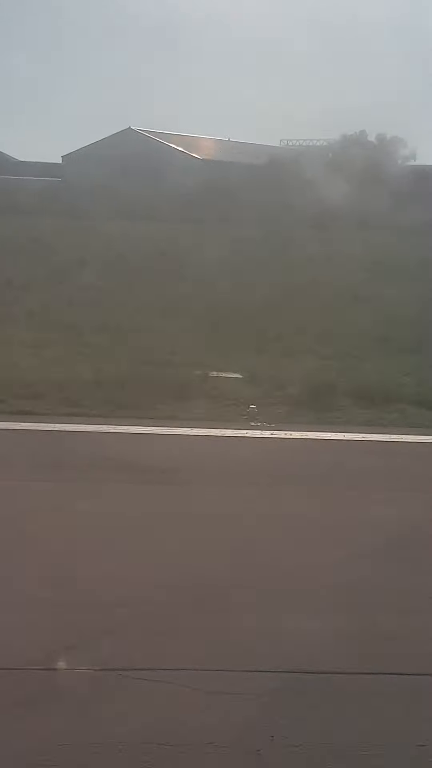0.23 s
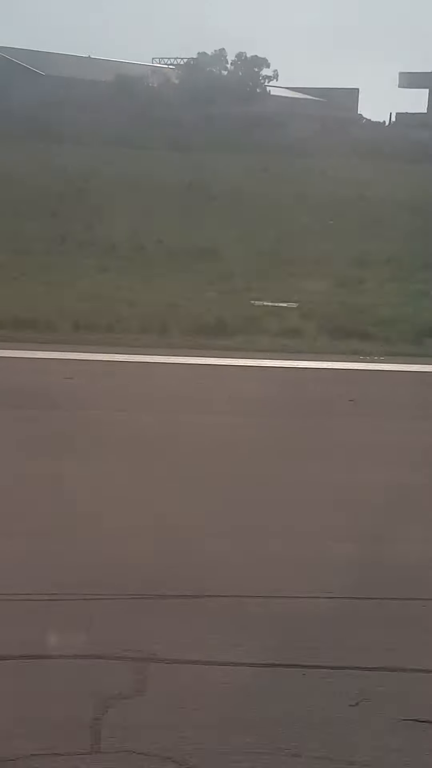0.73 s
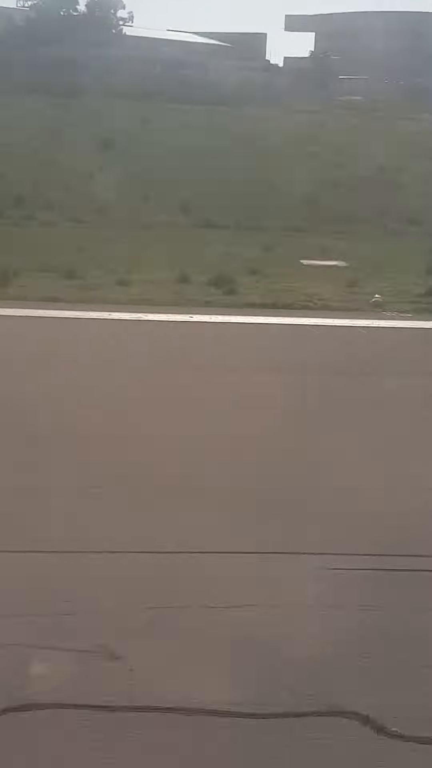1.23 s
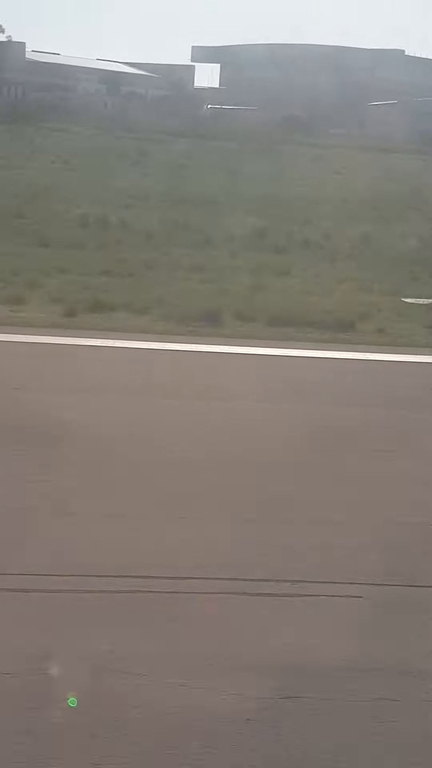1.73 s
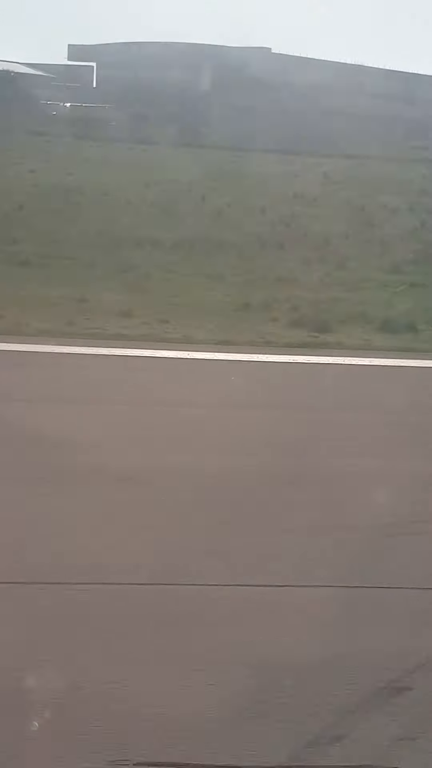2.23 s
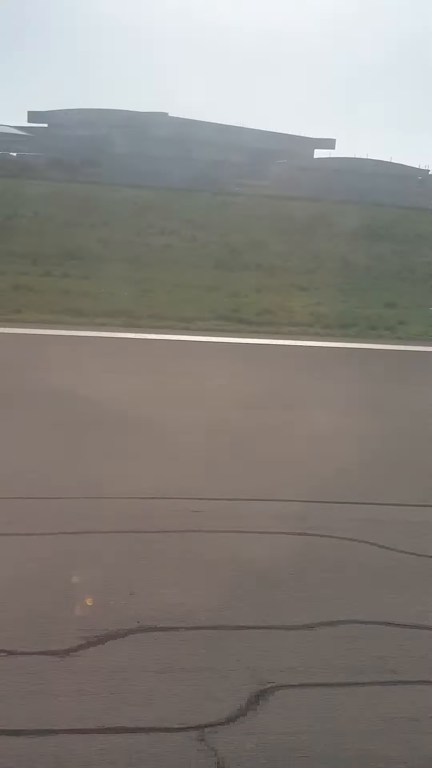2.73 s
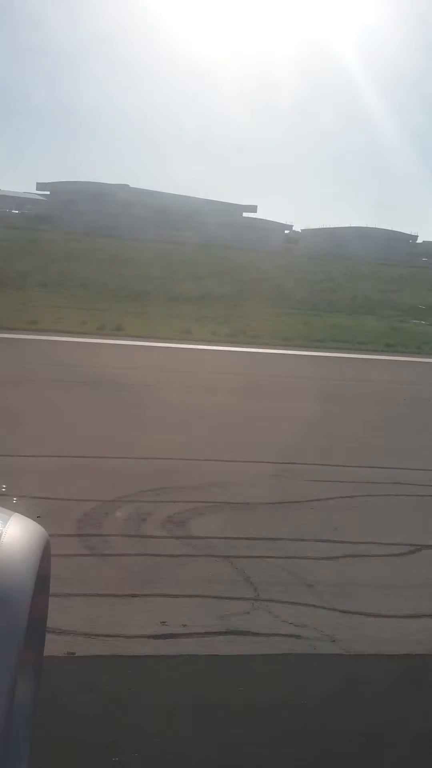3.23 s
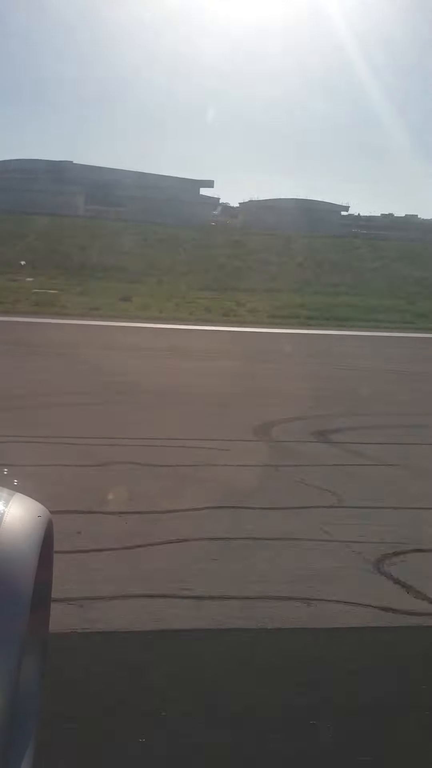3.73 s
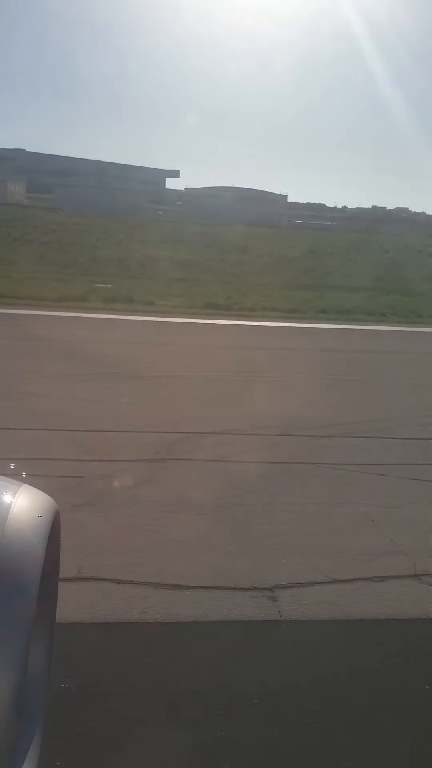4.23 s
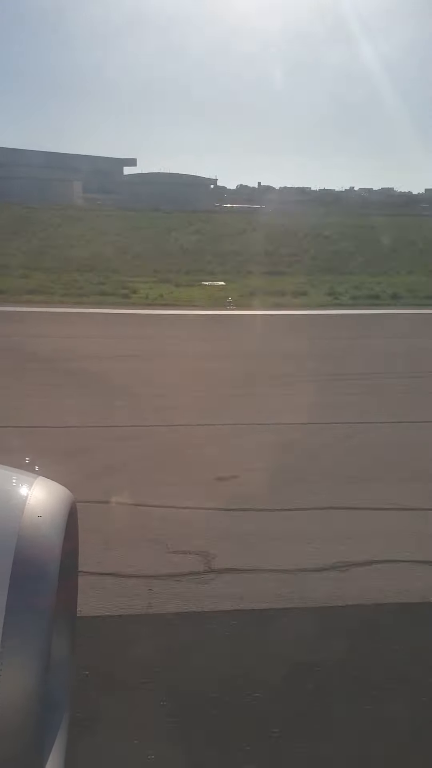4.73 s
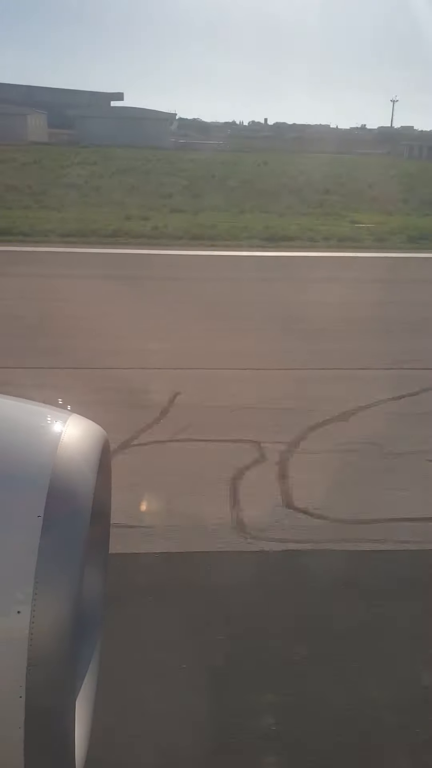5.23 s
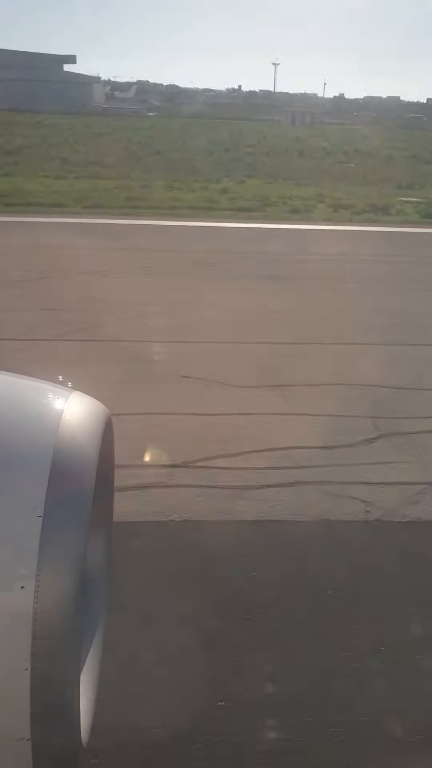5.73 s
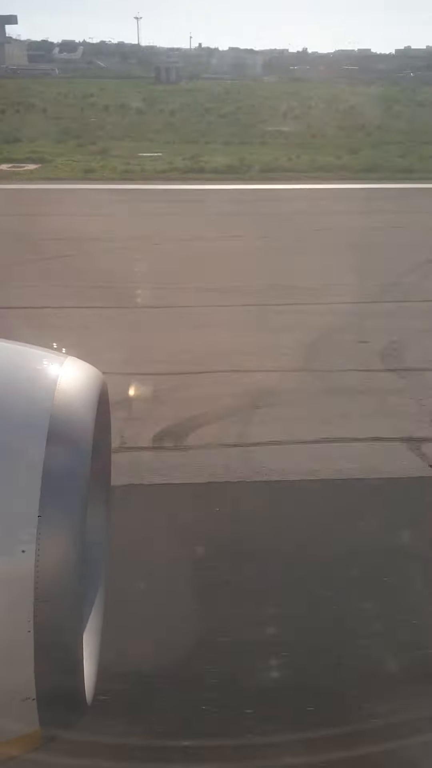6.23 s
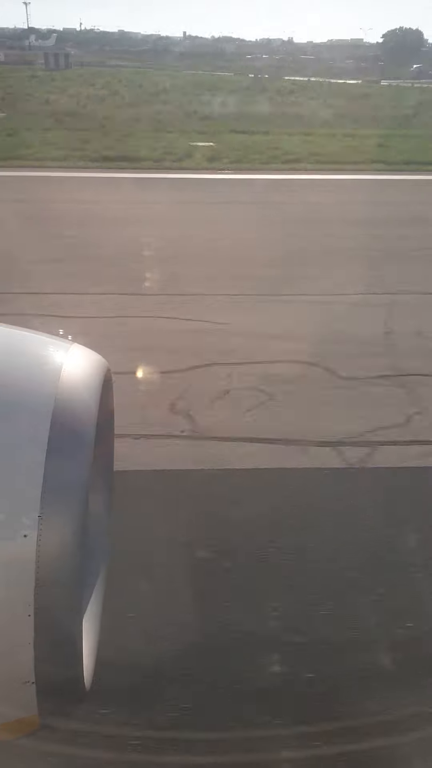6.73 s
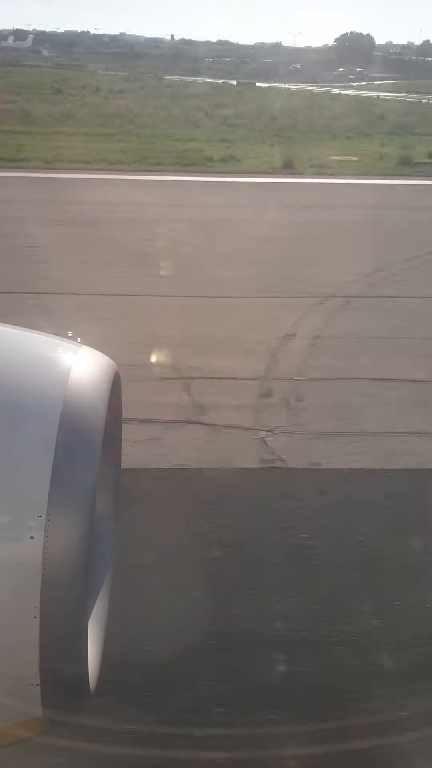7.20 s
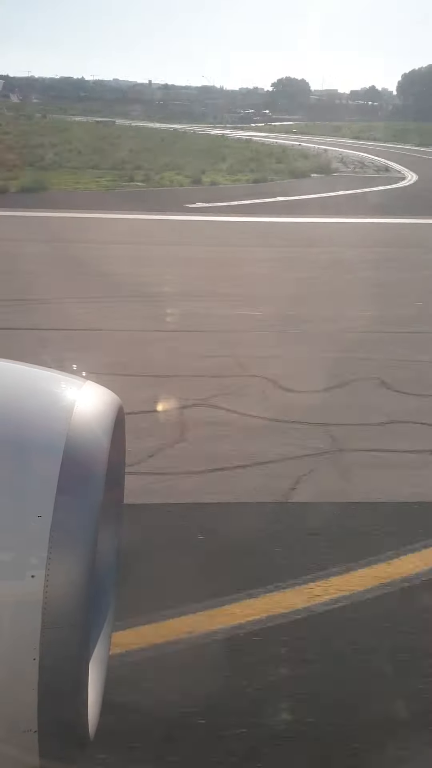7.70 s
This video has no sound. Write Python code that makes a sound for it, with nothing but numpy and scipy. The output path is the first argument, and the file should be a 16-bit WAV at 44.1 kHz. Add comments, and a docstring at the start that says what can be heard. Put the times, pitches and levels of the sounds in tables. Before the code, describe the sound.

A phone held in the cabin of a landing aircraft picks up a continuous, bass-heavy fuselage rumble, dull engine roar and softer airy hiss. Wheel blows swell as short deep thuds, hardest just before three seconds, shaking bins and panels. A low drone comes forward near four seconds. Later another thump, low shudders, rougher tyre noise and hard plastic snapping crowd the last stretch, without stopping.

```python
"""Window seat beside the engine of an airliner landing, heard by a phone's two microphone ports for eight seconds.
From the start the fuselage booms as filtered noise over engine, tyre and air noise, and a low sine drones.
The plastic trim rustles, rattles and squeaks, mostly on the right: noise bursts, decaying rings and gliding tones.
Near 2.5 s come the hardest thumps, swelling sines, and more air hiss; by 3.5 s the weight is on the wheels.
The drone is strongest near 4 s; coarse asphalt, low shudders and hard rattles fill the last two and a half seconds."""
import sys
import numpy as np
from scipy import signal
from scipy.fft import rfft, irfft
from scipy.io import wavfile
from scipy.ndimage import uniform_filter1d

SR = 44100
rng = np.random.default_rng(int(sys.argv[2]) if len(sys.argv) > 2 else 0)


def digitize_waveform(pressure):
    """Quantize a signal to 16-bit integers and store it at the path in sys.argv[1].

    Rows of a 2-D input are taken as channels; values are limited to [-1, 1].
    """
    field = np.atleast_2d(pressure).T
    bounded = np.clip(field, -1, 1)
    quanta = np.round(bounded * 32767).astype(np.int16)
    wavfile.write(sys.argv[1], SR, quanta)


N = 351036
TIME = np.arange(N) / SR  # s
FREQ = np.maximum(np.arange(N // 2 + 1) * SR / N, 1)  # Hz

# how hard the runway shakes the hull: start_s, boom level_db
RUNWAY_SHAKE = [(0, -18.5), (.6, -19), (1.05, -15.5), (1.8, -18.5), (2.2, -14.5), (2.43, -17), (2.9, -17.5),
                (3.6, -20), (4.2, -18.5), (5.38, -19.5), (5.52, -17), (6.05, -15.5), (6.5, -20.5),
                (6.7, -15.5), (6.92, -23.5), (7.15, -17), (7.55, -19.5), (7.95, -16)]
# strength of the engine's roar: start_s, level_db
ENGINE_LEVEL = [(0, -28.5), (.7, -30), (1.5, -28.5), (2.6, -29.5), (3.7, -31.5), (5.6, -29), (6.3, -30.5),
                (7.3, -29.5), (7.95, -31)]
# low boom of the hull: frequency_hz, density_db (per Hz, relative)
BOOM_SPECTRUM = [(15, -45), (24, -32), (32, -23), (43, -5.5), (51, 0.5), (63, -1.5), (78, -5.5), (95, -13),
                 (125, -29.5)]
# rumble of the cabin air: frequency_hz, density_db (per Hz, relative)
RUMBLE_SPECTRUM = [(60, -18.5), (88, -1), (104, 0), (128, -3.5), (153, -3), (180, -6.5), (230, -30.5)]
RUMBLE_OVER_ROAR_DB = 6.5


def fuselage(throb_db=1.5, throb_rate=9):
    """The runway shakes the hull into a throbbing boom; the cabin air rumbles with the engine."""
    (boom_db,), (engine_db,) = curves(RUNWAY_SHAKE), curves(ENGINE_LEVEL)
    boom = steady(diffuse(BOOM_SPECTRUM), span_s=.15)
    boom = boom * undb(boom_db + throb_db * walk(throb_rate))
    rumble = steady(diffuse(RUMBLE_SPECTRUM), span_s=0.14)
    return boom + rumble * undb(engine_db + RUMBLE_OVER_ROAR_DB)


# blows through the landing gear: start_s, peak level_db
GEAR_BLOWS = [(.03, -8), (2.245, -4), (2.523, -2), (4.908, -8), (5.465, -12), (6.639, -5)]
THUMP_HZ = 59.6


def gear(swell_s=0.034):
    """Each blow on the wheels swells through the struts into a few cycles of the hull."""
    out = np.zeros(N)
    for start_s, level_db in GEAR_BLOWS:
        t = np.maximum(TIME - start_s, 0)
        envelope = (t / swell_s * np.exp(1 - t / swell_s)) ** 6  # one at swell_s
        out += undb(level_db) * envelope * np.sin(2 * np.pi * THUMP_HZ * t)
    return out


# shudders of the hull: middle_s, length_s, mean pitch_hz, peak level_db
HULL_SHUDDERS = [(5.601, 0.34, 54, -15), (5.968, 0.29, 52.5, -11.5), (7.162, 0.39, 60, -16)]


def shudders(waver=0.018):
    """Over uneven stretches the hull shudders at one low pitch, which wavers slightly."""
    stretch = np.cumsum(1 + waver * walk(15)) / SR
    out = np.zeros(N)
    for middle_s, length_s, pitch_hz, level_db in HULL_SHUDDERS:
        out += undb(level_db) * swell(middle_s, length_s) * np.sin(2 * np.pi * pitch_hz * stretch)
    return out


# the low drone: start_s, mean pitch_hz, rms level_db
DRONE_PATH = [(0, 162, -36), (.95, 176, -41), (1.3, 177, -28), (1.55, 168, -32), (2.2, 160, -29.5),
              (2.42, 169, -34), (2.6, 169, -27), (3.6, 163, -23), (3.97, 161, -22.5), (4.35, 159, -30),
              (5.2, 159, -29), (5.6, 167.1, -27), (6.3, 161.7, -28), (6.55, 173.1, -29.5),
              (6.8, 172, -24.5), (7.16, 168.8, -31), (7.3, 167, -24), (7.95, 163, -25)]


def drone(waver_hz=1.304, flutter_db=1.35, firm_db=-25):
    """One unbroken low hum: firm in pitch while it is strong, wavering as it fades."""
    pitch_hz, level_db = curves(DRONE_PATH)
    # the waver is waver_hz at firm_db and widens as the level falls
    pitch = pitch_hz + waver_hz * undb(np.minimum(firm_db - level_db, 10)) * walk(22)
    gain = np.sqrt(2) * undb(level_db + flutter_db * walk(20))
    return gain * np.sin(2 * np.pi * np.cumsum(pitch) / SR)


# spectra of engine roar, tyres on asphalt and air along the skin: frequency_hz, density_db (per Hz, relative)
ROAR_SPECTRUM = [(140, -22), (190, -1.5), (218, 0), (258, -8), (305, -5.5), (355, -13), (380, -13.5),
                 (480, -20.5), (600, -29), (900, -52.5)]
TYRE_SPECTRUM = [(400, -18), (540, -4), (630, -1.5), (740, 0), (880, -1.5), (1000, -5), (1200, -19),
                 (1800, -41.5)]
AIR_SPECTRUM = [(700, -21.5), (1100, 0.5), (1450, 2), (1750, -0.5), (2100, 0), (2650, -3.5), (3100, -11),
                (5000, -17), (8000, -42)]
# tyre rush and air hiss at the usual shake (dB), and the dB they gain per dB of shake
USUAL_SHAKE_DB = -18
TYRE_DB, TYRE_SHARE, AIR_DB, AIR_SHARE = -52, 0.32, -54.0, 0.15
# the tyres scrub as they spin up: middle, length, rise of the hiss
SCRUB_S, SCRUB_LENGTH_S, SCRUB_DB = 2.55, 0.65, 1
# the tyres rush louder over coarse asphalt: middle, length, rise
COARSE_S, COARSE_LENGTH_S, COARSE_DB = 5.75, 1.1, 2.5
SETTLED_AIR_DB = -0.64  # the air hisses less with the weight on the wheels


def rush():
    """Engine roar, tyres on asphalt and air along the skin, each with its own turbulence."""
    (boom_db,), (engine_db,) = curves(RUNWAY_SHAKE), curves(ENGINE_LEVEL)
    shake_db = boom_db - USUAL_SHAKE_DB
    landing_db = SCRUB_DB * swell(SCRUB_S, SCRUB_LENGTH_S) + SETTLED_AIR_DB * settled()
    coarse_db = COARSE_DB * swell(COARSE_S, COARSE_LENGTH_S)
    roar = steady(diffuse(ROAR_SPECTRUM), span_s=0.39) * undb(engine_db + 0.88 * walk(25))
    tyre_db = TYRE_DB + TYRE_SHARE * shake_db + coarse_db + 0.4 * walk(30)
    tyres = diffuse(TYRE_SPECTRUM, echo_db=-29) * undb(tyre_db)
    air_db = AIR_DB + AIR_SHARE * shake_db + landing_db + .9 * walk(40)
    air = diffuse(AIR_SPECTRUM, echo_db=-24.5) * undb(air_db)
    return roar + eddies(tyres + air, depth_db=1.68)


# rattles of loose trim: start_s, level_db (reference for clack, snap and panel rings),
# snap brightness_db (relative to level_db), main ring pitch_hz, main ring level_db
TRIM_RATTLES = [(.208, -54, -20, 3300, -59), (.298, -57, -25, 3300, -56), (.438, -65, -8, 3500, -59),
                (.544, -59, -26, 5200, -58), (0.7157, -50.5, -24, 3900, -58),
                (0.8051, -52.5, -23, 5200, -58), (.885, -60, -28.5, 4050, -52.5),
                (1.306, -52.5, -20, 5200, -62.5), (1.4715, -53.5, -28, 4700, -59),
                (1.644, -61, -25.5, 4330, -60), (2.325, -56, -21, 3900, -57), (2.38, -57, -22, 4100, -59),
                (2.5685, -50.5, -26, 4600, -53.5), (2.6075, -53, -24, 3700, -56),
                (2.632, -53, -20, 4550, -54), (2.772, -59, -22.5, 3900, -54),
                (2.798, -57.5, -21.5, 4000, -53.5), (2.826, -55.5, -16, 4450, -54),
                (2.975, -56, -21, 6650, -61.5), (3.005, -54.5, -23, 4200, -54),
                (4.0382, -52, -16, 3700, -59), (4.0614, -53, -13, 3700, -57), (4.188, -56, -19, 5200, -65),
                (4.403, -59, -20, 5600, -59), (4.555, -53.5, -18, 3300, -56),
                (4.703, -56.5, -17, 5140, -57), (4.7685, -56, -12, 4600, -59),
                (4.7845, -52.5, -11, 5200, -58), (4.8144, -58, -15.5, 5600, -61),
                (4.908, -56.5, -17, 3750, -53.5), (4.945, -55.5, -17.5, 5660, -56),
                (4.993, -49, -15, 6400, -54), (5.0269, -55.5, -14, 6900, -63), (5.441, -51, -14, 4500, -58),
                (5.5188, -55.5, -5, 5300, -60), (6.442, -54, -15, 4300, -61), (6.6744, -51, -20, 5100, -59),
                (6.7315, -52, -18, 4300, -51.5), (6.783, -46, -12, 4700, -51),
                (6.864, -51.5, -21, 3700, -55), (6.953, -52.5, -13, 6400, -58),
                (7.0907, -50, -17, 5050, -49), (7.1054, -54, -7, 6100, -51), (7.207, -53.5, -25, 4900, -51),
                (7.2366, -49.5, -21, 4400, -52), (7.502, -55, -11, 4050, -53),
                (7.5377, -55, -18, 3830, -50), (7.616, -51.5, -14.5, 4700, -54)]
# clack of the trim: frequency_hz, density_db (per Hz, relative)
CLACK_SPECTRUM = [(1000, -15), (2400, 3.5), (4200, -1), (5800, -1.5), (7000, -6), (8800, -21.5),
                  (14000, -33)]
# fine crackle of plastic: frequency_hz, density_db (per Hz, relative)
CRACKLE_SPECTRUM = [(5000, -19.5), (8500, -8), (11000, -1), (12700, 0.5), (15500, -4), (18000, -15)]


def rattles(chatter_db=3, bounce_s=0.0099, bounce_db=-3):
    """Loose trim clacks and snaps as it chatters, rings at its own pitch and bounces once."""
    start_s, level_db, bright_db, ring_hz, ring_db = np.transpose(TRIM_RATTLES)
    clack = diffuse(CLACK_SPECTRUM, echo_db=-19.5) * bursts(
        start_s, level_db - 6.0, rise_s=0.00089, t60_s=0.12, tail_db=-15.0, tail_t60_s=0.4)
    snap = diffuse(CRACKLE_SPECTRUM) * bursts(
        start_s, level_db + bright_db + 0.5, rise_s=.0008, t60_s=0.076, tail_db=-17.5, tail_t60_s=.2)
    rings = panels(start_s, level_db + 0.5, t60_s=.08)
    rings = rings + main_rings(start_s, ring_db, ring_hz, t60_s=0.16, chatter_rate=1500)
    # each bounce comes one to two bounce_s later
    bounce_start_s = start_s + bounce_s * (1 + rng.random(len(start_s)))
    bounces = panels(bounce_start_s, level_db + bounce_db, t60_s=.08)
    return (clack + snap) * undb(chatter_db * walk(700)) + rings + bounces


# duller knocks of the luggage bins: start_s, level_db (of the noise; rings are set from it), initial ring pitch_hz
BIN_KNOCKS = [(.235, -52.5, 1400), (.44, -53, 2560), (.592, -54.5, 2310), (2.028, -55, 1790),
              (2.305, -49, 2130), (2.36, -52, 1690), (2.44, -51.5, 1450), (2.572, -47, 1660),
              (2.605, -47, 1544), (2.638, -50, 1390), (2.725, -53, 2420), (2.785, -52.5, 2480),
              (2.81, -52, 1620), (6.742, -48.5, 1405), (7.07, -53, 1383), (7.607, -49, 2450)]
# dull knock of a bin: frequency_hz, density_db (per Hz, relative)
BIN_SPECTRUM = [(300, -15), (900, 1), (1450, 4), (2400, -6), (3500, -13.5), (7000, -30)]


def bins(chatter_db=2.0):
    """The luggage bins knock and clatter dully and their hollow shells ring."""
    start_s, level_db, ring_hz = np.transpose(BIN_KNOCKS)
    knock = diffuse(BIN_SPECTRUM, echo_db=-14.5) * bursts(
        start_s, level_db, rise_s=0.002, t60_s=0.15, tail_db=-11.5, tail_t60_s=0.44)
    shells = main_rings(start_s, level_db + 4.5, ring_hz, t60_s=0.19, chatter_rate=200, sag_hz=2500)
    return knock * undb(chatter_db * walk(700)) + shells


# squeaks of rubbing plastic: start_s, level_db (reference for harmonics and scrape), initial slip rate pitch_hz
PLASTIC_SQUEAKS = [(.036, -50, 1450), (.238, -55, 1360), (.641, -56.5, 1380), (.978, -52, 1420),
                   (1.351, -50, 1427), (1.412, -58.5, 1383), (2.103, -44.5, 1432), (2.358, -51, 1430),
                   (2.416, -53, 1415), (2.447, -55, 1385), (2.564, -53, 1410), (2.606, -53, 1410),
                   (2.627, -51.5, 1415), (2.808, -54, 1432), (4.594, -52.5, 1402), (6.745, -57, 1388),
                   (7.049, -54, 1392), (7.069, -49, 1410)]


def squeaks(length_s=0.005, sag_hz=2000, rough=0.012, colour_db=1.5, harmonics_db=(-4.5, -9, -8.5, -1)):
    """Plastic sticks and slips, swelling for length_s as the pitch sags (Hz per s), each in its own colour."""
    out, t = np.zeros(N), TIME[:SR // 20]
    jitter = 1 + rough * walk(2200)
    envelope = (t / length_s * np.exp(1 - t / length_s)) ** 2
    draws = rng.standard_normal((len(PLASTIC_SQUEAKS), len(harmonics_db)))
    for (start_s, level_db, pitch_hz), draw in zip(PLASTIC_SQUEAKS, draws):
        start = int(start_s * SR)
        near = slice(start, start + len(t))
        phase = 2 * np.pi * np.cumsum((pitch_hz - sag_hz * t) * jitter[near]) / SR
        tone = np.zeros(len(t))
        for k, harmonic_db in enumerate(harmonics_db):
            tone += undb(harmonic_db + colour_db * draw[k]) * np.sin((k + 1) * phase)
        out[near] += undb(level_db) * envelope * tone
    return out * undb(2.0 * walk(500))


def scrapes(scrape_db=-7):
    """Every squeak drags a short dry scrape with it."""
    start_s, level_db, _ = np.transpose(PLASTIC_SQUEAKS)
    return diffuse(CLACK_SPECTRUM) * bursts(
        start_s, level_db + scrape_db, rise_s=.004, t60_s=0.098, tail_db=-18.5, tail_t60_s=.25)


# spells of rubbing between trim panels: middle_s, length_s, rustle level_db, fine crackle level_db
RUBBING_SPELLS = [(.27, 0.21, -69, -88), (0.99, 0.47, -63.5, -76.5), (2.353, 0.34, -64.5, -80.5),
                  (2.65, 0.3, -63.5, -76), (2.91, 0.21, -70.5, -74.5), (3.35, 0.72, -72, -80),
                  (4.14, 0.2, -70, -82), (4.82, 0.18, -72, -74.5), (5.249, 1, -66.5, -76.5),
                  (5.881, 0.53, -67, -78.5), (6.455, 0.41, -67.5, -75.5), (6.75, 0.35, -65, -72),
                  (7.1, 0.3, -66.5, -72), (7.68, 0.7, -67, -76)]
# rustle of the panels: frequency_hz, density_db (per Hz, relative)
RUSTLE_SPECTRUM = [(2000, -14), (3200, -2.5), (4000, -2), (5100, -2.5), (6300, -6), (7200, -11),
                   (8500, -25.5), (12000, -40.5)]
RUSTLE_DB, CRACKLE_DB = -70, -84.5  # between the spells, before the weight settles
SETTLED_RUB_DB = 1.5  # rise of this steady rubbing once the weight has settled


def chafing(grain_db=1.5, slip_db=1.57):
    """Panels rub in spells of tiny slips: a grainy rustle with a fine crackle on top."""
    load_db = SETTLED_RUB_DB * settled()
    rustle, crackle = undb(RUSTLE_DB + load_db), undb(CRACKLE_DB + load_db)
    for middle_s, length_s, rustle_db, crackle_db in RUBBING_SPELLS:
        spell = swell(middle_s, length_s)
        rustle = np.hypot(rustle, undb(rustle_db) * spell)
        crackle = np.hypot(crackle, undb(crackle_db) * spell)
    slips = undb(grain_db * walk(600) + slip_db * walk(70))
    rustling = rustle * diffuse(RUSTLE_SPECTRUM, echo_db=-29.5)
    crackling = crackle * diffuse(CRACKLE_SPECTRUM, echo_db=-28.5)
    return slips * (rustling + crackling)


# thin whistles and peeps, plus (rows at 6.755 s and 7.08 s) a stronger second harmonic for the squeaks there:
# middle_s, length_s, mean pitch_hz, level_db
THIN_WHISTLES = [(0.625, 0.058, 1640, -45.5), (0.985, 0.38, 4960, -62), (1.18, 0.3, 1270, -49),
                 (1.53, 0.066, 3420, -64), (1.897, 0.026, 1810, -46), (3.07, .08, 1560, -48.5),
                 (4.2, 0.4, 3680, -65), (5.462, 0.05, 1815, -47), (6.755, .03, 2750, -53),
                 (7.08, .035, 2740, -52.5), (7.7, 0.09, 1680, -49.5)]


def whistles(waver=.02, flutter_db=2.5, faint_db=-56, faint_s=0.034, low_hz=1150, high_hz=2200, count=55):
    """Thin airy tones swell and fade, unsteady in pitch and strength, among many short peeps."""
    out, stretch = np.zeros(N), np.cumsum(1 + waver * walk(900)) / SR
    peeps = []
    for when, pitch in rng.random((count, 2)):
        peeps.append((when * TIME[-1], faint_s, low_hz * (high_hz / low_hz) ** pitch, faint_db))
    for middle_s, length_s, pitch_hz, level_db in list(THIN_WHISTLES) + peeps:
        near = slice(max(int((middle_s - 2 * length_s) * SR), 0), int((middle_s + 2 * length_s) * SR))
        envelope = np.exp(-(2 * (TIME[near] - middle_s) / length_s) ** 2)
        out[near] += undb(level_db) * envelope * np.sin(2 * np.pi * pitch_hz * stretch[near])
    return out * undb(flutter_db * walk(90))


def small_ticks(count=90, mean_db=-55, spread_db=2):
    """Faint ticks of fittings all over the cabin, each a short ring of three modes."""
    draw = rng.random((count, 2))
    level_db = mean_db + spread_db * (2 * draw[:, 1] - 1)
    return panels(draw[:, 0] * TIME[-1], level_db, low_hz=1790, high_hz=6020, t60_s=0.073, count=3)


def panels(times, dbs, low_hz=2600, high_hz=6200, t60_s=0.088, count=6):
    """Every struck panel rings briefly with a few modes of its own."""
    out, t = np.zeros(N), TIME[:SR // 8]
    for start_s, level_db, draw in zip(times, dbs, rng.random((len(times), count))):
        mode_hz = low_hz + (high_hz - low_hz) * draw[:, None]
        modes = np.sin(2 * np.pi * mode_hz * t + 2 * np.pi * rng.random((count, 1)))
        ring = modes.mean(0) * np.exp(-np.log(1000) * t / t60_s)
        start = int(start_s * SR)
        out[start:start + len(t)] += undb(level_db) * ring[:N - start]
    return ports(out)


def main_rings(times, dbs, pitches, t60_s, chatter_rate, sag_hz=0):
    """A struck part's main resonance, broadened by chatter (contacts per s), sinking as it relaxes (Hz per s)."""
    out, t = np.zeros(N), TIME[:SR // 5]
    chatter = (walk(chatter_rate) + 1j * walk(chatter_rate)) / np.sqrt(2)
    for start_s, level_db, pitch_hz in zip(times, dbs, pitches):
        near = slice(int(start_s * SR), int(start_s * SR) + len(t))
        turn = 2j * np.pi * (pitch_hz - sag_hz * t / 2)
        ring = np.exp((turn - np.log(1000) / t60_s) * t)
        out[near] += undb(level_db) * np.real(chatter[near] * ring)
    return ports(out)


def bursts(times, dbs, rise_s, t60_s, tail_db, tail_t60_s):
    """Envelope of contacts: a quick rise, a short ring and a weak tail from the cabin."""
    t = TIME[:SR // 2]
    decay = 1000 ** (-t / t60_s) + undb(tail_db) * 1000 ** (-t / tail_t60_s)
    shape = (1 - np.exp(-t / rise_s)) * decay
    power = np.zeros(N)
    np.add.at(power, (np.asarray(times) * SR).astype(int), undb(dbs) ** 2)
    return np.sqrt(np.maximum(signal.fftconvolve(power, shape ** 2)[:N], 0))


def eddies(pair, depth_db, size=512, count=5):
    """Turbulence: every narrow band swells and sinks on its own over a few hundredths of a second."""
    bands = signal.stft(pair, nperseg=size)[2]
    chance = uniform_filter1d(rng.standard_normal(bands.shape[1:]), count, axis=1)
    chance = uniform_filter1d(chance, 2, axis=0)
    return signal.istft(bands * undb(depth_db * unit(chance)), nperseg=size)[1][:, :N]


# likeness of the sound at the two microphone ports: frequency_hz, squared coherence (clipped to 0..1)
PORT_LIKENESS = [(60, 1.1), (130, 0.85), (300, 0.95), (500, 0.8), (800, 0.3), (1200, 0.07), (15000, -0.13)]


def diffuse(spectrum, echo_db=-60):
    """Noise from all round the cabin: long waves reach both ports alike; nearby panels comb it with echoes."""
    mid, side = rfft(rng.standard_normal((2, N)))
    alike = np.sqrt(np.clip(over_freq(PORT_LIKENESS), 0, 1))
    mid, side = mid * np.sqrt(1 + alike), side * np.sqrt(1 - alike)
    walls = np.zeros(N)
    walls[0] = 1
    delays = rng.integers(SR // 300, SR // 50, size=12)  # 3 to 20 ms
    walls[delays] = undb(echo_db) * rng.choice([-1, 1], size=12)
    pair = irfft(np.array([mid + side, mid - side]) * rfft(walls), N)
    pair = colour(pair, spectrum)
    return ports(pair / np.sqrt(np.mean(pair.mean(0) ** 2)))


# tilt between the two microphone ports: frequency_hz, left minus right level_db
PORT_TILT = [(60, 0), (200, -2), (380, -3.5), (700, -2.5), (900, -1), (1290, -6), (2380, -13), (4400, -11),
             (8120, -19), (13000, -8)]
PORT_LAG_S = 0.00025


def ports(x):
    """Two ports of a phone: the left hears the cabin a little earlier, the right hears it brighter."""
    left = undb(over_freq(PORT_TILT))
    early_left = left * np.exp(2j * np.pi * FREQ * PORT_LAG_S)
    keep_power = np.sqrt(2 / (1 + left ** 2))
    response = np.array([early_left, np.ones(len(FREQ))]) * keep_power
    return irfft(rfft(x) * response, N)


def steady(pair, span_s):
    """Even out swells slower than span_s and keep the quick throb."""
    return pair / np.sqrt(uniform_filter1d(pair.mean(0) ** 2, int(span_s * SR)) + 1e-9)


def swell(middle_s, length_s):
    """A smooth rise and fall, one at its middle; length_s is its width at 1/e."""
    return np.exp(-(2 * (TIME - middle_s) / length_s) ** 2)


SETTLE_S, SETTLING_S = 3.1, .12  # when the weight settles, and its time constant


def settled():
    """Share of the weight on the wheels, from zero to one."""
    return .5 + .5 * np.tanh((TIME - SETTLE_S) / SETTLING_S)


def walk(rate):
    """Slow chance: random levels held 1 / rate s and slewed twice, spread one."""
    k = max(int(SR / rate), 1)
    held = np.repeat(rng.standard_normal(N // k + 1), k)
    return unit(uniform_filter1d(uniform_filter1d(held, k), k)[:N])


def colour(x, spectrum):
    """Filter by a spectrum that falls away steeply beyond its ends."""
    low_skirt = np.minimum(FREQ / spectrum[0][0], 1) ** 2
    high_skirt = np.minimum(spectrum[-1][0] / FREQ, 1) ** 2
    return irfft(rfft(x) * undb(over_freq(spectrum)) * low_skirt * high_skirt, N)


def over_freq(points):
    """Points joined on a log-frequency axis."""
    hz, value = np.transpose(points)
    return np.interp(np.log(FREQ), np.log(hz), value)


def curves(table):
    """Each column of a table, joined by straight lines in time."""
    start_s, *columns = np.transpose(table)
    return [np.interp(TIME, start_s, column) for column in columns]


def unit(x):
    """Scale to an rms of one."""
    return x / np.sqrt(np.mean(x ** 2))


def undb(db):
    """Decibels to gain."""
    return 10 ** (np.asarray(db) / 20)


def scene():
    """All sources at the seat; thumps, shudders and drone reach both ports alike."""
    aircraft = fuselage() + gear() + shudders() + drone() + rush()
    fittings = rattles() + bins() + scrapes() + chafing() + small_ticks()
    tones = ports(squeaks() + whistles())
    fade_in = np.minimum(TIME / .01, 1)
    return (aircraft + fittings + tones) * fade_in


TOP_HZ = 15700


def record(dry):
    """The phone rounds the loudest peaks and cuts the top."""
    rounded = dry / (1 + (dry / .95) ** 8) ** (1 / 8)
    return signal.sosfilt(signal.ellip(8, .2, 70, TOP_HZ, fs=SR, output="sos"), rounded)


dry = scene()
out = record(dry)
digitize_waveform(out)
```